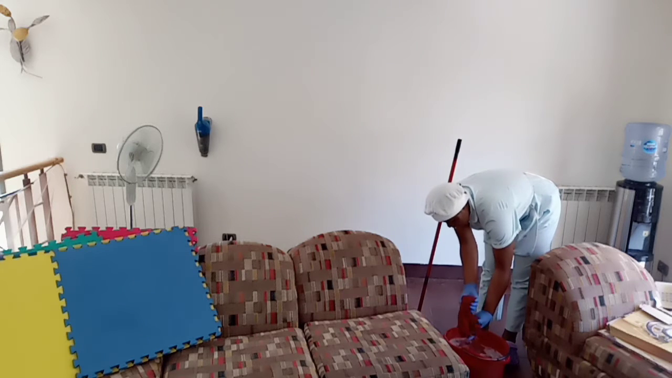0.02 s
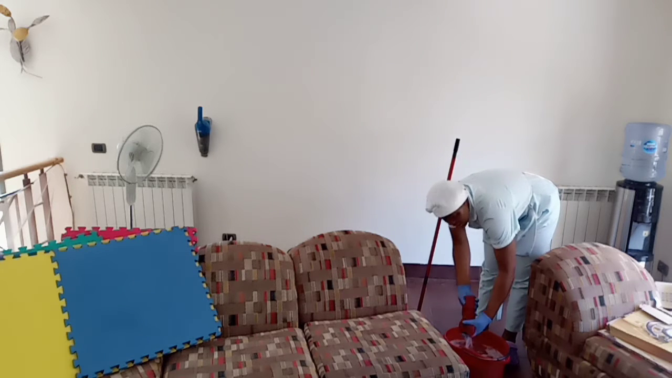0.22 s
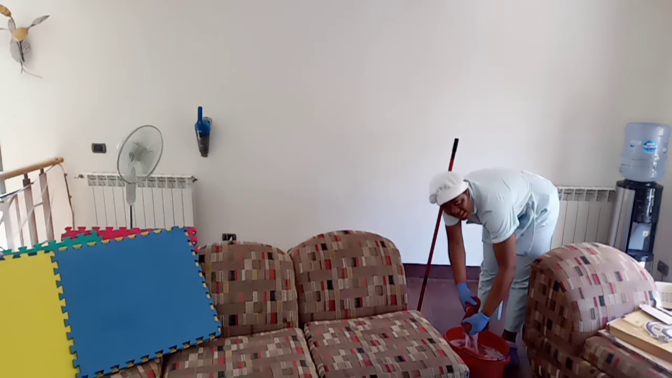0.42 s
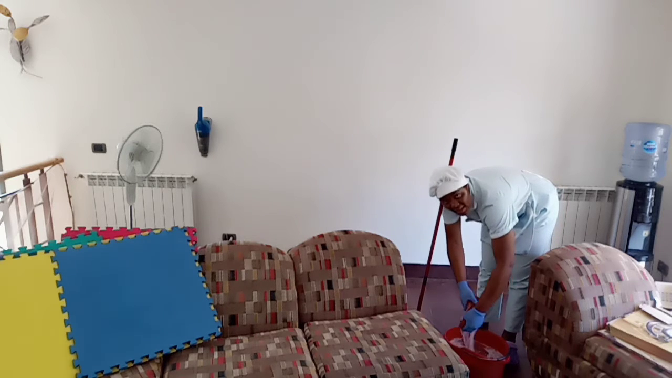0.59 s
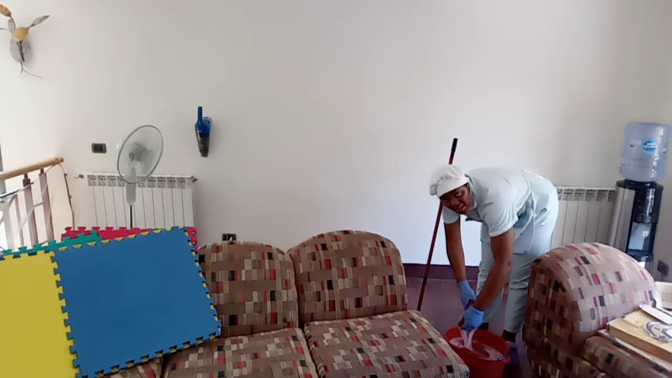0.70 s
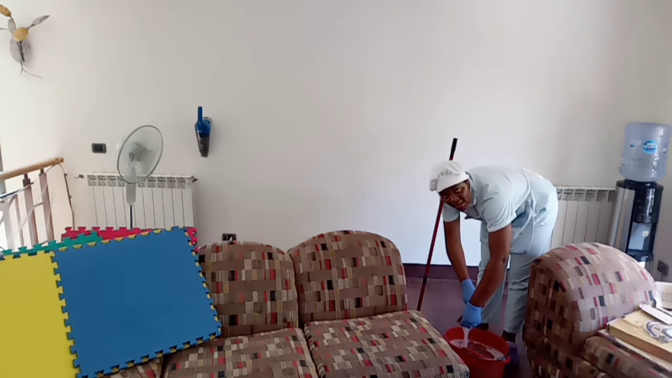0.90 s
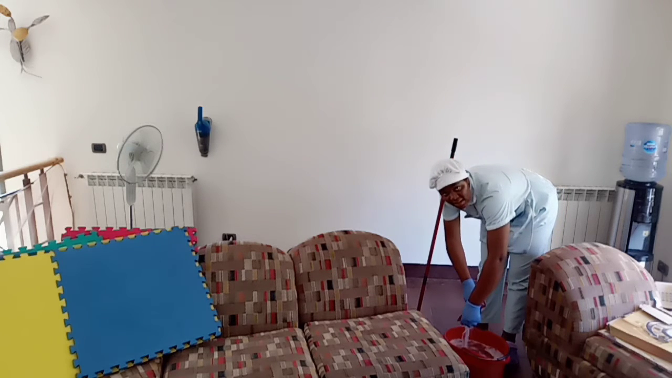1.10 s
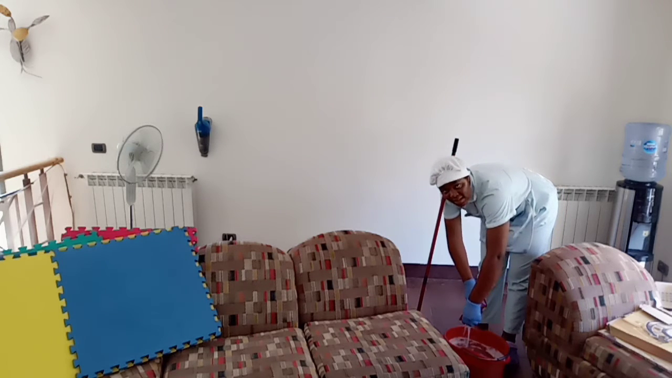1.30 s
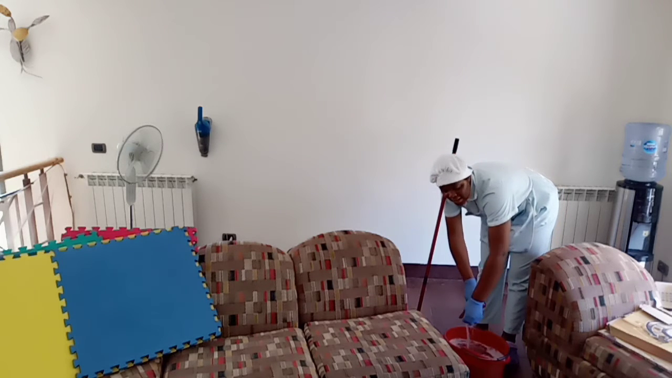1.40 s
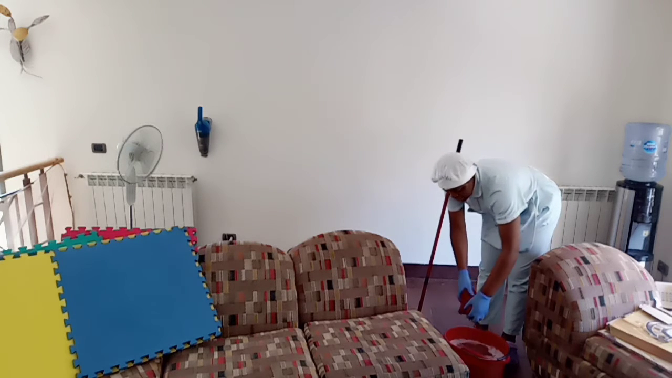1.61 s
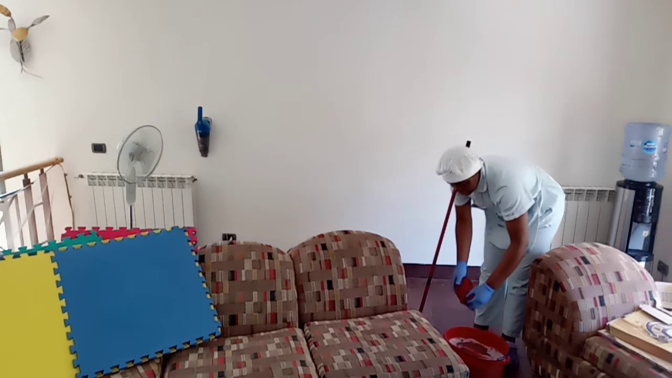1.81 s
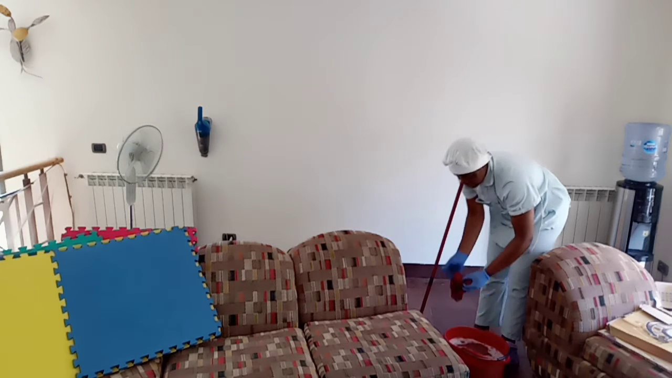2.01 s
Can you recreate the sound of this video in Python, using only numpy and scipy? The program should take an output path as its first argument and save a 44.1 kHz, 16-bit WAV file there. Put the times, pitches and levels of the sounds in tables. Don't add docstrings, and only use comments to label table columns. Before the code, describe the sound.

Water trickles and plinks into a plastic bucket as a wet mop is wrung by hand indoors

```python
import sys
import numpy as np
from scipy import signal
from scipy.fft import rfft, irfft
from scipy.io import wavfile
from scipy.ndimage import uniform_filter1d

SR = 44100
rng = np.random.default_rng(int(sys.argv[2]) if len(sys.argv) > 2 else 0)


def wav_record(signal):
    frames = np.transpose(np.atleast_2d(signal))
    bounded = np.clip(frames, -1, 1)
    quanta = np.round(bounded * 32767).astype(np.int16)
    wavfile.write(sys.argv[1], SR, quanta)


def invert_db(x):
    u = np.asarray(x, float) / 20
    return 10 ** u


N = 90405


def evened(x):
    return x / np.sqrt(np.mean(x ** 2) + 1e-20)


def wander(first, second):
    noise = rng.standard_normal(N)
    return evened(uniform_filter1d(uniform_filter1d(noise, size=first), size=second))


def read(points, hz):
    f, value = np.transpose(points)
    return np.interp(np.log(hz + 1), np.log(f + 1), value)


def add(mix, s, sound):
    part = mix[max(round(s * SR), 0):][:len(sound)]
    part += sound[:len(part)]


def colour(x, table):
    z, hz = rfft(x), np.fft.rfftfreq(len(x), 1 / SR)
    power = np.interp(hz, hz[::8], uniform_filter1d(abs(z[::8]) ** 2, size=25))
    shape = invert_db(read(table, hz)) * np.minimum(hz / table[0][0], 1) ** 4
    flat = z / np.sqrt(power + 1e-4 * power.max())
    return evened(irfft(flat * shape, len(x)))


def background():
    # [f/Hz, level/dB]
    hiss = [(15, -73), (25, -31), (86, -1), (221, -5.5), (267, -10.5), (632, -17), (897, -17.5),
            (3350, -17), (15600, -60)]
    hiss_db, hum_hz, hum_db = -65, 98.5, -74
    waver = 1 + 0.25 * evened(uniform_filter1d(rng.standard_normal(N), size=3000))
    hum = invert_db(hum_db) * waver * np.sin(2 * np.pi * hum_hz * np.arange(N) / SR)
    return invert_db(hiss_db) * colour(rng.standard_normal(N), hiss) + hum


def room(x, stretch, wet_db=0):
    # [f/Hz, t60/s]
    decay = [(250, 0.38), (1000, 0.43), (3500, 0.34), (10000, 0.17)]
    # [delay t/s, level/dB]
    echoes = [
        (.0045, -2),
        (0.0098, -1),
        (0.0152, -8.5),
        (0.023, -2.5),
        (0.028, -18),
        (.052, -10.5),
    ]
    tail_db, spacing = -2.5, 20
    taps = np.zeros(SR // 2)
    at = np.arange(300, SR // 2 - spacing, spacing)
    taps[at + rng.integers(0, spacing, len(at))] = rng.choice([-1., 1.], len(at))
    hz, t, z = signal.stft(taps, SR, nperseg=256)
    fade = invert_db(-60 * t / read(decay, hz)[:, None])
    tail = signal.istft(z * fade, SR, nperseg=256)[1]
    tail = invert_db(tail_db) * tail / np.linalg.norm(tail)
    direct = (0.0012, -wet_db)
    for s, db in list(echoes) + [direct]:
        add(tail, s * stretch, invert_db(db) * np.ones(1))
    return invert_db(wet_db) * signal.fftconvolve(x, tail)[:N]


def bubble(hz, cycles, glide, db=0):
    rise, swell = .26, 3.5
    cycles = max(cycles, 1)
    u = np.arange(0, 4, hz / cycles / SR)
    v = u / (2 * rise)
    shape = (v * np.exp(1 - v)) ** swell
    return invert_db(db) * shape * np.sin(2 * np.pi * cycles * (u + glide * u ** 2))


def gurgle(table, width_hz):
    blows_per_s = 420
    s, hz, db = np.transpose(table)
    t = np.arange(N) / SR
    blows = rng.standard_normal(N) * (rng.random(N) < blows_per_s / SR)
    turn = np.exp(2j * np.pi * np.cumsum(np.interp(t, s, hz)) / SR)
    r = np.exp(-np.pi * width_hz / SR)
    ring = signal.lfilter([1], [1, -2 * r, r * r], blows / turn)
    return invert_db(np.interp(t, s, db)) * evened((ring * turn).real)


def hollows():
    # [t/s, f/Hz, level/dB]
    hollow = [(.1, 520, -73), (.53, 617, -68.5), (.58, 612, -52.5), (.7, 531.8, -49.5), (.78, 490, -55.5),
              (.85, 610, -53), (.94, 480, -69), (1.08, 540, -52), (1.3, 505, -65.5), (1.58, 496, -62.5),
              (1.68, 497.5, -52), (1.79, 486, -117)]
    # [t/s, f/Hz, level/dB]
    bucket = [(.3, 293.4, -89), (.46, 301.4, -61), (.65, 316, -75.5), (.8, 331, -60), (.9, 319, -66),
              (.97, 288.6, -49.5), (1.1, 288, -59.5), (1.25, 273, -65.5), (1.42, 290, -65),
              (1.55, 294, -76), (1.75, 298, -100)]
    return gurgle(hollow, width_hz=110) + gurgle(bucket, width_hz=42)


def splashes():
    # [start t/s, length/s, level/dB, first f/Hz, last f/Hz]
    bursts = [(.056, 0.0064, -45, 3460, 5560), (0.831, .02, -35, 2960, 3300),
              (0.97, 0.034, -36, 3060, 3100), (1.191, 0.021, -39, 3360, 4150),
              (1.228, 0.017, -44, 3540, 3270), (1.299, 0.011, -31.5, 2300, 3420),
              (1.323, 0.024, -43, 2940, 2980), (1.353, 0.026, -56, 3200, 2900),
              (1.412, 0.016, -42, 3300, 3170), (1.613, 0.072, -48.5, 3350, 3660),
              (1.712, 0.029, -47.5, 2500, 3840), (1.743, .03, -51, 4060, 3560),
              (1.857, 0.012, -52, 3500, 3660)]
    per_s, spread_octaves = 2000, .38
    out = np.zeros(N)
    for (s, length, db, first_hz, last_hz), luck in zip(bursts, rng.random((len(bursts), 200, 3))):
        for late, size, strong in luck[:int(length * per_s)]:
            slid_hz = first_hz * (last_hz / first_hz) ** late
            hz = slid_hz * 2 ** (spread_octaves * (2 * size - 1))
            add(out, s + length * late, bubble(hz, 5.2, 0.023, db - 12 * strong))
    return out


def glugs():
    # [start t/s, peak level/dB, f/Hz, cycles]
    large = [(.172, -50.5, 513, 11.4), (0.333, -37, 1110, 2.2), (.566, -41, 652, 5.7),
             (.635, -35.5, 530, 6.3), (.679, -40, 601, 4.4), (.813, -28.5, 851.7, 19.7),
             (.925, -38.5, 501, 12.5), (.9645, -26, 1076, 4.2), (.972, -31.5, 1013, 9.7),
             (0.964, -46, 294, 4.9), (1.18, -42.5, 870, 6.9), (1.23, -45.5, 533, 8.2),
             (1.487, -40.5, 531, 5.7), (1.656, -35.5, 828, 11.5), (1.655, -39.5, 492, 12.4),
             (.71, -44, 514, 8.2), (.742, -46.5, 464, 6.8), (1.06, -47.5, 545, 8.3),
             (1.711, -43.5, 978, 6.1)]
    out = np.zeros(N)
    for s, db, hz, cycles in large:
        add(out, s, bubble(hz, cycles, 0.0036, db - 0.5))
    return out


def plinks():
    # [start t/s, peak level/dB, f/Hz]
    ordinary = [(0.0563, -37, 3580), (0.0889, -35, 3540), (0.1835, -34, 2540), (0.2003, -33.5, 2276),
                (0.2728, -34.5, 2616), (0.3237, -32.5, 2340), (0.3571, -26, 3215), (0.38, -27, 2980),
                (0.4314, -33.5, 1980), (0.4503, -34, 3280), (0.5194, -28, 3050), (0.5478, -28.5, 2660),
                (0.5797, -26.5, 2570), (0.6353, -15.5, 3400), (0.7482, -29, 2390), (0.7746, -35, 2133),
                (0.835, -23.5, 3184), (0.9298, -26, 3700), (0.9661, -28.5, 3700), (1.0409, -23, 3240),
                (1.2291, -27.5, 3250), (1.3052, -29.5, 2475), (1.4097, -35, 3900), (1.648, -34, 3980),
                (1.712, -34, 2500), (1.7509, -26.5, 3510), (1.8601, -44.5, 1504)]
    # [start t/s, peak level/dB, f/Hz, cycles]
    others = [(.008, -42, 3140, 9.8), (0.8883, -26.5, 2550, 5.2), (0.939, -29, 3620, 12),
              (1.016, -37, 2520, 45), (1.034, -26.5, 2305, 13.4), (1.064, -30, 2630, 5.6),
              (1.227, -32, 2020, 24), (1.21, -30, 4570, 15), (1.2972, -27.5, 2164, 6.9),
              (1.33, -30.5, 2020, 15), (1.351, -21.5, 3900, 3.1), (1.358, -37, 2155, 14),
              (1.7096, -33, 2354, 3.8), (1.713, -34.5, 3640, 7.7), (.642, -24, 3500, 8.4),
              (1.727, -43, 2770, 4.4), (1.7685, -56, 3750, 4.3)]
    glide, spread, trail_s = 0.023, 0.33, 0.0089
    out = np.zeros(N)
    events = [(*row, 12) for row in ordinary] + list(others)
    for (s, db, hz, cycles), luck in zip(events, rng.random((len(events), 3, 2))):
        add(out, s - .001, bubble(hz, cycles, glide, db - 6.5))
        for late, size in luck:
            near_hz = hz * (1 + spread * (size - .5))
            add(out, s + trail_s * late, bubble(near_hz, cycles, glide, db - 15))
    return out


def spits():
    # [start t/s, peak level/dB, f/Hz]
    sprays = [(.008, -50, 8350), (0.0582, -49.5, 9130), (.06, -60, 12900), (.238, -53, 10300),
              (.324, -49.5, 6350), (0.338, -42, 9860), (.345, -54, 11800), (.722, -40.5, 7400),
              (1.196, -44.5, 6100), (1.232, -41.5, 7700), (1.351, -41.5, 7440), (1.583, -55, 8400),
              (1.728, -47, 7740), (1.861, -53, 9600), (1.922, -58, 8050), (.475, -45.5, 6830),
              (0.542, -38.5, 9430), (0.645, -39, 6700), (.704, -38, 10900), (0.782, -34.5, 8720),
              (.897, -43, 11400), (.929, -42, 9000), (0.969, -34, 9200), (1.048, -37, 9270),
              (1.066, -33.5, 10800), (1.107, -36, 5760), (1.262, -46.5, 14200), (1.411, -44, 9100),
              (1.527, -43.5, 9300), (1.715, -46.5, 12600), (1.899, -57, 12000)]
    length_s, spread_octaves, tilt_db = .006, .3, -9
    out = np.zeros(N)
    for (s, db, hz), luck in zip(sprays, rng.random((len(sprays), 10, 4))):
        for early, late, size, weak in luck:
            drop_hz = min(hz * 2 ** (spread_octaves * (2 * size - 1)), SR / 3)
            drop_db = db - 3.5 - 10 * weak + tilt_db * (size - .5)
            add(out, s + length_s * (early + late - .6), bubble(drop_hz, 9.1, 0.023, drop_db))
    return out


def crowd(table, per_s, cycles, spread_db, surge_db, count=40):
    lo, hi = table[1][0], min(table[-1][0], 1.3 * table[-2][0])
    strength_db = spread_db * np.minimum(rng.exponential(1, N), 2.5) + surge_db
    hits = invert_db(strength_db) * (rng.random(N) < per_s / SR)
    kind, luck, out = rng.integers(0, count, N), rng.random((count, 2)), np.zeros(N)
    for k, hz in enumerate(np.geomspace(lo, hi, count)):
        shape = bubble(hz, cycles * (.5 + luck[k, 0]), 0.16 * luck[k, 1])
        shape = shape / np.linalg.norm(shape) * np.sqrt(hz)
        out += signal.oaconvolve(hits * (kind == k), shape)[:N]
    return colour(out, table)


def trickle():
    # [t/s, level/dB, big bubbles over flow/dB, spray over flow/dB]
    flow = [(0, -56.5, -22, 8.5), (.048, -61.5, -3, -7), (.068, -55, -8, 5), (0.15, -57, 2, -12),
            (0.19, -51, 8, -7.5), (.312, -52.5, 3.5, -0.5), (.342, -48, 6, -1), (.56, -40.5, -3, -1.5),
            (.91, -40, 3.5, 1.5), (1.21, -41, -2, 1.5), (1.285, -52.5, 13.5, 9), (1.32, -43, -14, -2.5),
            (1.46, -50.5, -0.5, 4.5), (1.56, -52.5, -12, 8), (1.67, -54.5, -1, 4),
            (1.775, -53.5, -5.5, 2.5), (1.881, -64.5, 5.5, 4), (2.05, -68, 3, 3.5)]
    # [f/Hz, level/dB]
    big = [(130, -69), (220, -37), (280, -15), (377, -18.5), (495, -8), (716, -8.5), (848, -5.5),
           (1500, -11.5), (1950, -4), (3300, -120)]
    # [f/Hz, level/dB]
    small = [(900, -12), (1500, -15.5), (2030, -7), (2520, 0), (2980, -5), (3500, -2), (4300, -6.5),
             (5300, -28)]
    # [f/Hz, level/dB]
    spray = [(3060, -62), (5200, 0.5), (5730, -9), (6940, -7.5), (7710, -7), (9440, 0.5), (12600, -15),
             (15600, -13.5)]
    s, flow_db, big_db, spray_db = np.transpose(flow)

    def follow(db):
        return invert_db(np.interp(np.arange(N) / SR, s, db))

    surge, patter = wander(500, 300), wander(200, 120)
    big_part = invert_db(-11) * follow(big_db) * crowd(big, 500, 6, 3.5, 2 * surge)
    small_part = invert_db(-1) * crowd(small, 4000, 7, 3, 1.2 * surge)
    spray_part = invert_db(-12) * follow(spray_db) * crowd(spray, 1800, 9, 5, .6 * surge + 2.3 * patter)
    return follow(flow_db) * (big_part + small_part + spray_part)


def scene():
    mix = background()
    drops = hollows() + splashes() + glugs() + plinks() + spits()
    mix += room(drops, 0.96, wet_db=-5)
    water = invert_db(-2.5) * trickle()
    turn = np.pi * 3 * np.arange(N) / SR
    for k, stretch in enumerate([.83, 1.07, 1.21]):
        share = np.cos(turn + k * np.pi / 3) * np.sqrt(2 / 3)
        mix += room(water * share, stretch, wet_db=-3)
    return mix[None]


def low_pass(x):
    return signal.sosfilt(signal.butter(12, 15700, fs=SR, output="sos"), x)


def record(dry):
    edge_hz = 15520
    mix = signal.oaconvolve(dry, signal.firwin(151, edge_hz, fs=SR)[None], "same")
    return low_pass(mix)


dry = scene()
out = record(dry)
wav_record(out)
```